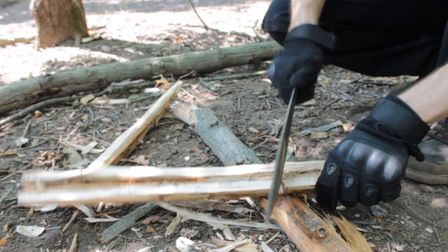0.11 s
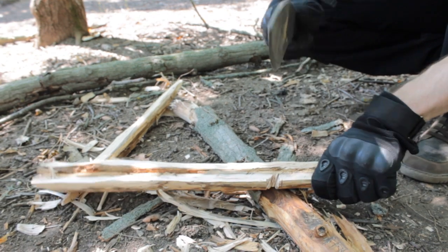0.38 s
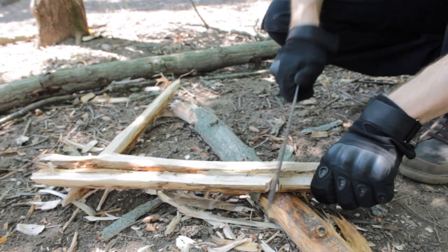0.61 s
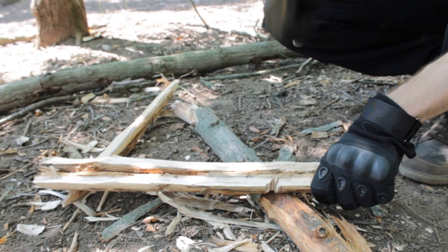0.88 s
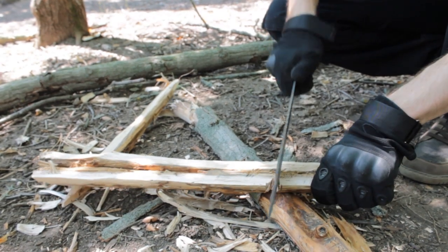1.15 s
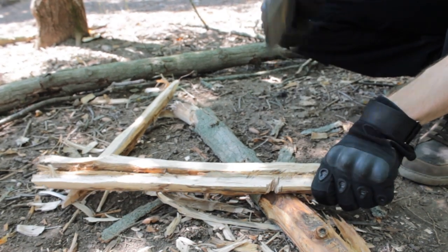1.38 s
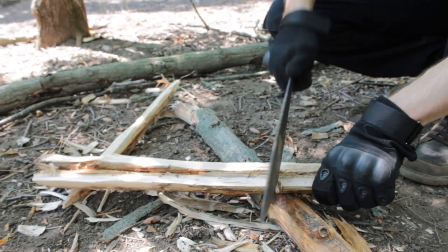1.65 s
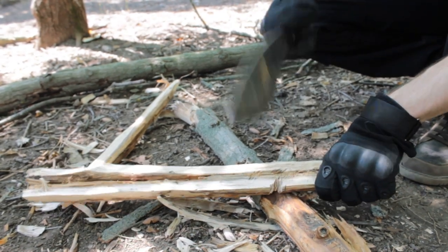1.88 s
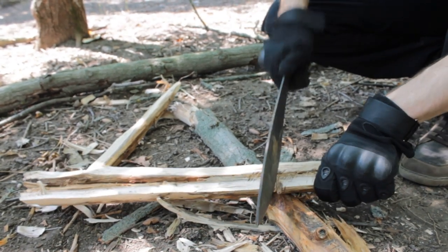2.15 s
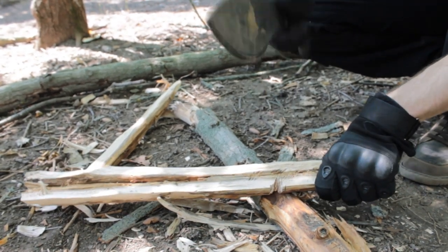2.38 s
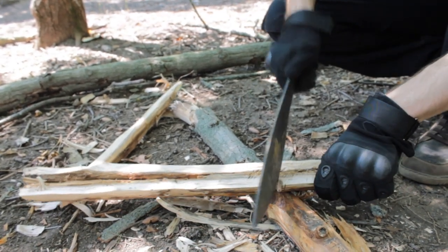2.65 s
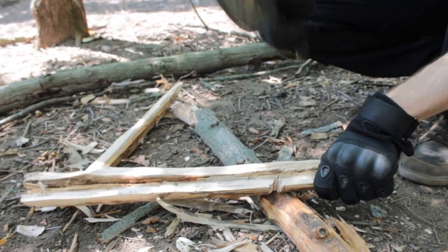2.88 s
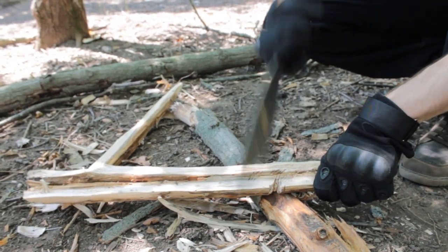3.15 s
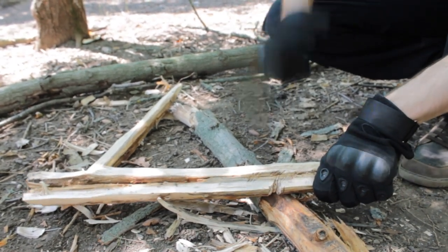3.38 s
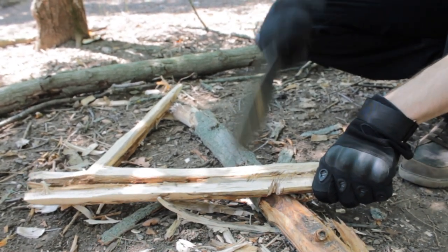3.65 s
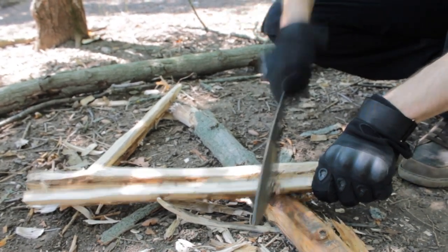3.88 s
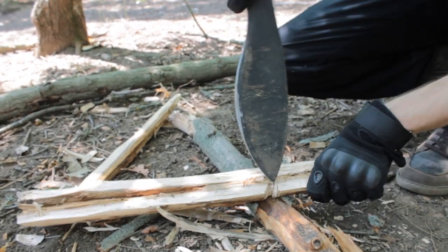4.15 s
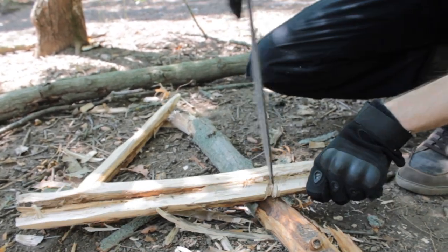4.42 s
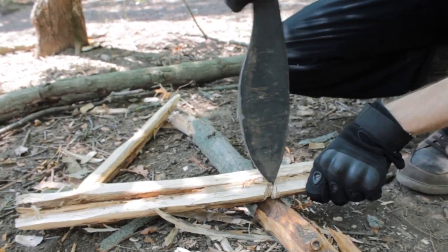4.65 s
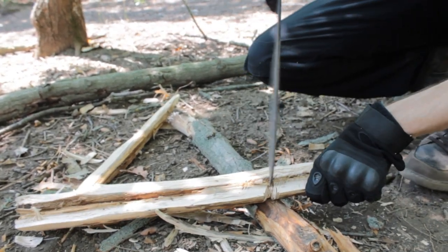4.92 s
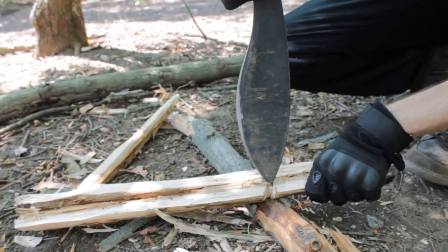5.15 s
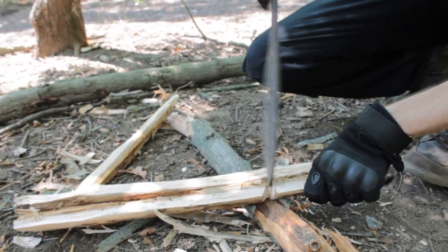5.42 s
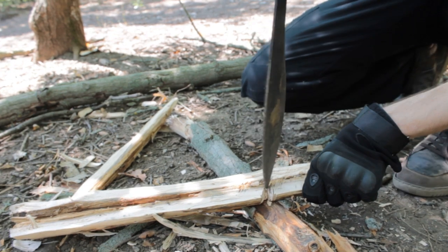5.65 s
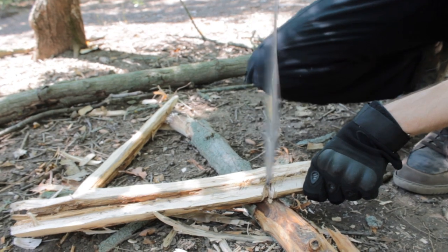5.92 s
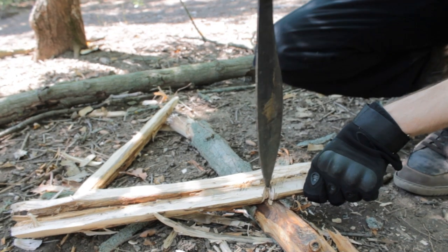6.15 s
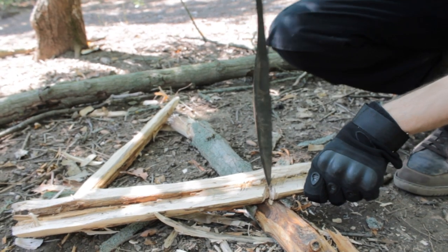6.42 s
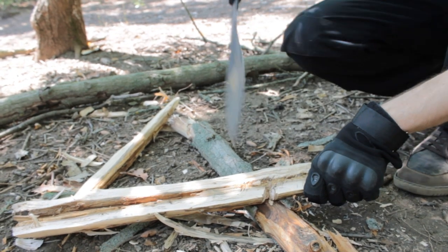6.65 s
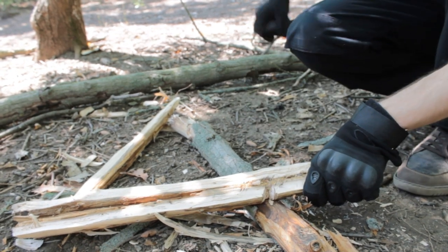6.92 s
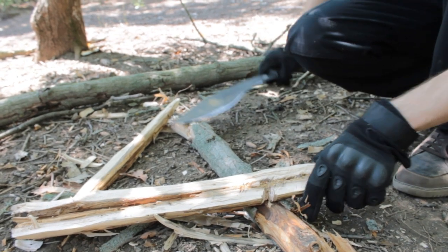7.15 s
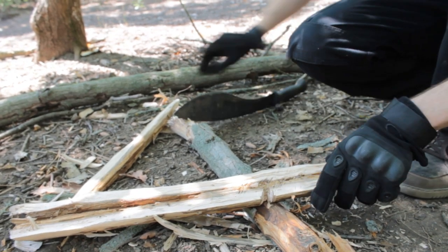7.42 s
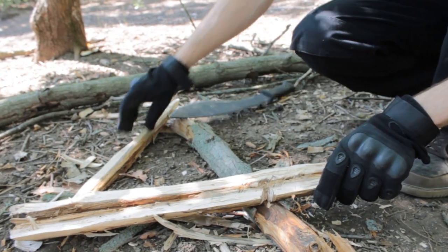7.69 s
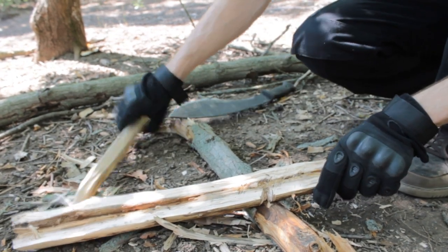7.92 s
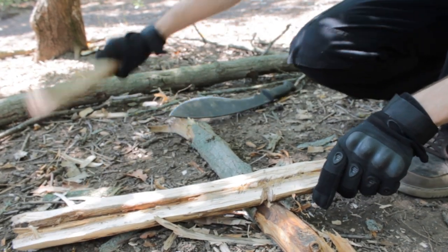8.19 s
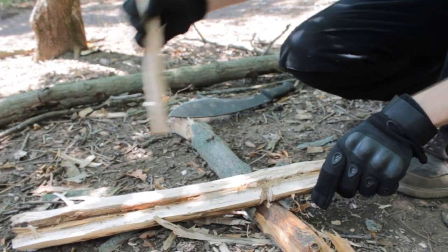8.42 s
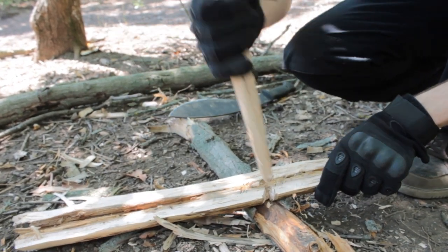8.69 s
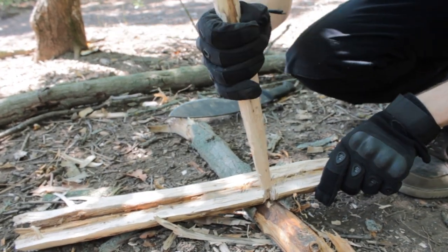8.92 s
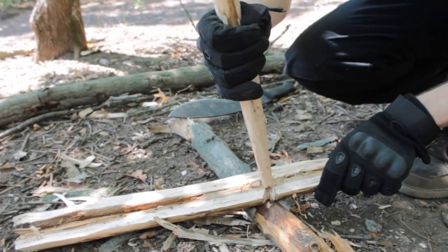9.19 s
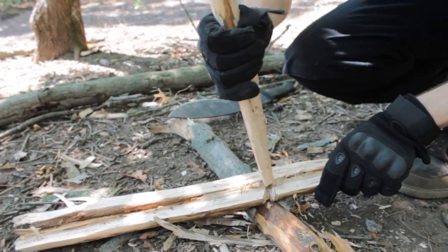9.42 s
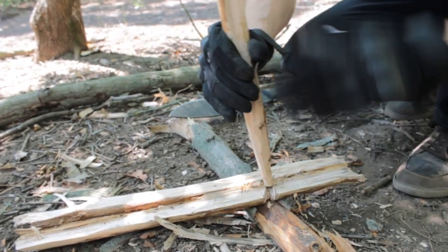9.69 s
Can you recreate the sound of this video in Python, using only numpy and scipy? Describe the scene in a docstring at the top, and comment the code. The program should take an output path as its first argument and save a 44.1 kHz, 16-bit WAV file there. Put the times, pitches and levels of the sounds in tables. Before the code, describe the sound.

After a small rustle and click, a heavy blade chops a split stick seven times, about twice a second, so close the blows clip. Each dry woody crack gets a short scattered echo from the trunks. Then quiet picking ticks, the blade set down with a clatter, wooden pieces handled, litter scrapes, and a sharp twig snap near the end, over faint forest air and distant birds.

```python
"""Leaves rustle and a small contact clicks, then a heavy blade chops seven times into a split stick
in a forest clearing, so close that the blows clip the microphone input: struck wood and steel ring
as damped resonances, torn fibres are noise bursts, and the trunks answer with scattered noise.
Afterwards chips click, the tip picks at the notch, blade and wedge are moved about, a twig snaps.
Filtered noise makes litter, two breeze puffs and forest air; gliding sines are birds far off."""
import sys
import numpy as np
from scipy import signal
from scipy.fft import rfft, irfft, next_fast_len
from scipy.io import wavfile
from scipy.ndimage import uniform_filter1d

SR = 44100
rng = np.random.default_rng(int(sys.argv[2]) if len(sys.argv) > 2 else 0)


def ratio_of_db(decibels):
    """Turn decibels (scalar or array-like) into linear amplitude factors; 0 dB maps to 1."""
    return 10 ** (np.asarray(decibels, float) / 20)


def master(y):
    """Save y as 16-bit WAV."""
    cut = np.clip(np.atleast_2d(y).T, -1, 1)
    pcm = np.round(cut * 32767)  # scale
    wavfile.write(sys.argv[1], SR, pcm.astype(np.int16))


N = 432621  # samples

# All levels are those at the microphone, ahead of its input stage.
# Blows on the stick. Each row: start in seconds, knock peak in dB, bite time constant in ms,
# thud peak over the knock in dB, crack peak over the knock in dB.
CHOP_BLOWS = [(.582, 1.5, 3.2, -14.5, -8.5), (1.114, 8.5, 3, -10, -9.5), (1.59, 8.5, 3.8, -4.5, -7.5),
              (2.123, 1, 2.3, -3.5, -3.5), (2.557, 8, 3.7, -7, -3), (3.026, 9.5, 3, -0.5, -6),
              (3.489, 7, 1.8, -8, -0.5)]
# Low bending of the struck stick. Each row: centre in Hz, width in Hz, relative level in dB.
THUD_MODES = [(104, 41, -12.5), (175, 96, -1.5), (477, 230, 6)]
# Short knock of the struck stick. Each row: centre in Hz, width in Hz, relative level in dB.
KNOCK_MODES = [(900, 350, -4.5), (1263, 150, 2), (1554, 370, 2.5), (1875, 980, -0.5), (2540, 680, -8),
               (3300, 590, -10)]
# Spectrum of tearing fibres. Each row: frequency in Hz, relative density in dB per Hz.
CRACK_SPECTRUM = [(1180, -38.5), (2000, -1.5), (2720, -11), (3430, 2.5), (5470, -4), (7200, 1),
                  (7720, -2.5), (15200, -22), (16500, -31)]
FIRST_TOUCH = 2.5  # the edge's first jerk, over the random ones that follow

# Ringing of the steel blade. Each row: frequency in Hz, relative level in dB, free t60 in seconds.
BLADE_MODES = [(2250, -1, 0.083), (3950, 0, 0.15), (5520, -1.5, 0.23), (7150, -1.5, 0.23)]
BLADE_DB, BLADE_FREE = -39, .9  # ring under the blow; factor on the free t60 during a blow
# Light knocks on the steel. Each row: start in seconds, level in dB, factor on the free t60,
# favoured mode in Hz.
STEEL_PINGS = [(1.778, -47.5, 0.85, 5520), (2.257, -49, .4, 5520), (5.843, -46.5, 0.32, 5520),
               (5.846, -49, 0.35, 7150), (7.353, -48, 2.2, 3950)]

# Scatter among the trunks. Each row: frequency in Hz, t60 in seconds.
TRUNK_DECAY = [(60, .16), (300, 0.12), (1000, 0.15), (2000, 0.15), (5000, 0.25), (7000, .3), (9500, .3),
               (15000, .15)]
# Distinct echoes in that scatter. Each row: delay in seconds, lift in dB.
TRUNK_ECHOES = [(.026, 3.5), (0.061, 2.5), (.13, 2), (0.202, 3.5)]
# Wash from deeper in the wood. Each row: frequency in Hz, level at zero delay in dB.
DEEP_WASH = [(300, -40.5), (1000, -11), (1600, -13.5), (2200, -12), (4500, -21.5), (9000, -40.5)]
DEEP_T60_S, UNEVEN_DB = 0.39, 1.4  # decay of the wash; scale of its random unevenness
# Colour of the clearing's answer. Each row: frequency in Hz, gain in dB.
ECHO_COLOUR = [(35, -27), (60, 5.5), (422, -2.5), (559, -4), (1300, 1), (1940, -6), (2240, -4), (2700, -4),
               (4750, -5), (15000, -28.5), (16500, -46.5)]
ECHO_DB = -22  # gain of the answer, beside the blow
# Bands in which a blow hangs on among the trunks. Each row: centre in Hz, width in Hz,
# mean relative level in dB.
LINGER_BANDS = [(1330, 250, -1), (1700, 250, -1.5), (2170, 220, -1), (3240, 350, -6), (4220, 520, -5.5)]
LINGER_DB, LINGER_T60_S, LINGER_RISE_S, LINGER_SCATTER_DB = -42, 0.56, .07, 2

# Small contacts of wood and chips. Each row: start in seconds, scratch peak in dB,
# ring peak over the scratch in dB, pitch of the piece in Hz.
CONTACT_TAPS = [(.1042, -31.5, -23, 1430), (.2887, -40.5, -32, 1840), (.3496, -41.5, -21, 2700),
                (.6529, -36, 15, 1570), (.6810, -29, -16, 1930), (.7637, -37, -16, 2580),
                (.8131, -43, -7, 1500), (.8649, -45.5, -12, 2500), (1.7778, -40.5, -2, 1900),
                (1.8153, -35, -17, 1670), (1.868, -43, -17, 2100), (1.956, -41.5, -19, 1430),
                (2.2204, -33, -20, 2720), (2.2555, -36, -17, 2250), (2.7447, -29, -10, 1530),
                (3.0944, -25, -12, 1880), (3.1473, -34, -10, 1510), (4.2024, -44, 5, 2000),
                (4.3625, -44, -9, 1630), (4.515, -52, 7, 760), (5.1144, -42, -12, 2700),
                (5.4643, -44, -17, 1450), (5.6054, -36.5, -11.5, 1700), (5.8433, -37, -8, 1590),
                (6.0838, -41.5, -14, 1650), (6.1106, -53.5, 8, 690), (6.2609, -38.5, -24, 2800),
                (7.0282, -40, -8, 1400), (7.1345, -25.5, 10.5, 1140), (7.1402, -29.5, 1, 1390),
                (7.218, -26.5, 9, 1106), (7.2609, -41, 3, 1090), (7.2944, -54, 19, 1090),
                (7.3072, -36, -15, 2010), (7.338, -40, 2, 1750), (7.3506, -13.5, -1, 1710),
                (7.3676, -36, 7, 2000), (7.4075, -34.5, 5, 1130), (7.414, -44.5, 10, 2400),
                (7.5761, -50, 15, 1160), (7.6492, -23.5, -13, 1700), (7.6544, -23.5, -1, 970),
                (7.6831, -40, 7, 1060), (7.7027, -38, 10, 1180), (7.9195, -26, -4, 2200),
                (7.9307, -32, -10, 1900), (7.9423, -30, 2, 1060), (7.9555, -31.5, 8.5, 1860),
                (7.9745, -38, 14, 1980), (7.9816, -32.5, 10, 1800), (7.9962, -30, -2, 1600),
                (8.0105, -19, -14, 1700), (8.0702, -25.5, -16, 2220), (8.3479, -43, -19, 1450),
                (8.3914, -36.5, -20, 1310), (8.552, -41, -3, 1870), (8.7202, -28, -22, 1200),
                (8.765, -32, -8, 1190), (8.8496, -42, -17, 1450), (9.1689, -37, -20, 1400),
                (9.3297, -32, -27.5, 1070), (9.3423, -28.5, -19.5, 2240), (9.5014, -39, -12, 1700),
                (9.6053, -54, -1, 1500), (9.6455, -22.5, 2.5, 1380), (9.7364, -34, -20, 1750)]
SCRATCH_OVER_RING, SCRATCH_TOP_OVER_RING = 2.48, 5.3  # scratch centre and upper corner over the pitch
SCRATCH_T60_S, RING_T60_S = .03, .026  # RING_T60_S is an added damping of what excites the ring
FAINT_PER_S, FAINT_DB, FAINT_SPREAD_DB = 5, -51.5, 4  # stray crumbs of bark and leaf; spread is +-
# Thin high snaps of dry bark. Each row: start in seconds, peak in dB.
BARK_TICKS = [(1.285, -55), (1.71, -49), (1.778, -41.5), (1.79, -35), (1.857, -48), (4.452, -48),
              (4.605, -53.5), (4.785, -49), (4.815, -39), (3.775, -56), (4.926, -54), (5.031, -44),
              (5.066, -34), (5.157, -50), (6.262, -36), (7.308, -38), (7.337, -40), (7.617, -41),
              (7.9186, -41), (7.9307, -36), (7.9423, -34), (8.08, -44), (8.098, -41), (9.335, -45)]
# Weight landing on soil. Each row: start in seconds, peak in dB.
SOIL_THUMPS = [(0.12, -38.5), (7.136, -41.5), (7.219, -44), (7.351, -29), (7.655, -55), (7.979, -41.5),
               (8.521, -53), (8.766, -56), (9.643, -49)]

# Twig breaking fibre by fibre. Each entry: one crack's level in dB, on top of SNAP_DB.
SNAP_CRACKS = [-2.5, -2.5, -0.5, -12]
SNAP_S, SNAP_GAP_S, SNAP_T60_S = 9.640, 0.0026, 0.0079  # first crack, time between cracks, decay
SNAP_DB, SNAP_ECHO_DB = -8.5, -23.5  # reference peak; echo peak over it

# Scrapes and brushing through litter. Each row: start in seconds, length in seconds,
# rms level ahead of the swell in dB, centre in Hz.
LITTER_SCRAPES = [(0.104, .053, -43, 2560), (.616, 0.013, -31.5, 6000), (0.679, 0.017, -40, 5000),
                  (9.588, .022, -47.5, 6000), (4.098, 0.17, -60, 4500), (4.148, 0.29, -55.5, 1000),
                  (5.056, 0.06, -59, 7500), (5.817, 0.044, -48, 3500), (6.26, 0.052, -55.5, 5070),
                  (6.534, 0.082, -55.5, 1100), (6.869, 0.16, -54, 4030), (7.331, 0.05, -42, 3430),
                  (7.915, 0.14, -39.5, 2700), (8.047, .077, -44.5, 4100), (8.334, 0.09, -48, 3220),
                  (8.441, 0.15, -53, 4450), (9.306, 0.055, -48.5, 3540), (9.494, 0.15, -54.5, 3970)]
# Spectrum of dry leaves. Each row: frequency in Hz, relative density in dB per Hz.
LEAF_SPECTRUM = [(470, -37), (800, -8.5), (1250, -6.5), (1490, -1.5), (1630, -3.5), (2380, -2.5),
                 (6460, -5.5), (15100, -26.5), (16500, -34.5)]
# Stir of litter and cloth. Each row: time in seconds, leaf crackle rms in dB.
STIR_LEVEL = [(0, -59), (.95, -64), (1.3, -65), (1.77, -58.5), (2.0, -65), (2.7, -60), (2.9, -65),
              (3.651, -62), (4.02, -66), (4.2, -60), (5.501, -63.5), (6.67, -62), (7.0, -61.5), (7.32, -54),
              (7.7, -62.5), (8.4, -58.5), (9.2, -67), (9.55, -58.5), (9.81, -64)]
# Soft shuffle of cloth and soil. Each row: frequency in Hz, relative density in dB per Hz.
SHUFFLE_SPECTRUM = [(60, -23.5), (150, -2.0), (400, 0.5), (1100, -4.5), (2200, -14.5), (5000, -51.0)]
SHUFFLE_DB, SHUFFLE_FOLLOWS = -61, .3  # mean level; its share of the stir's swings

# Breeze on the microphone. Each row: centre in seconds, Gaussian half-length in seconds,
# rms at the centre in dB.
BREEZE_PUFFS = [(4.7, .12, -71), (5.0, 0.11, -67)]
# Spectrum of the breeze. Each row: frequency in Hz, relative density in dB per Hz.
BREEZE_SPECTRUM = [(10, -20), (30, -3), (60, -5), (150, -50)]
# Far bird chirps. Each row: start in seconds, length in seconds, start pitch in Hz,
# end pitch in Hz, mean level in dB.
FAR_CHIRPS = [(.36, .05, 2450, 2250, -66), (.51, .025, 3400, 3280, -64), (8.98, 0.044, 2900, 3300, -64),
              (.41, .04, 3370, 3530, -64), (.445, .023, 2980, 3020, -61), (1.42, 0.018, 3300, 3730, -57),
              (2.372, .025, 2440, 4420, -47.5), (2.48, .033, 2700, 3360, -44.5),
              (4.96, .059, 2494, 4030, -61.5), (6.57, 0.047, 2920, 2980, -58),
              (6.65, 0.046, 3180, 3560, -61.5), (6.775, 0.031, 2750, 3100, -57),
              (8.185, 0.032, 3240, 4200, -57), (8.83, .028, 2700, 3970, -55.5),
              (9.365, .025, 2590, 2943, -69)]
# Faint far held notes. Each row: start in seconds, length in seconds, start pitch in Hz,
# end pitch in Hz, mean level in dB.
FAR_NOTES = [(.16, .23, 1200, 1218, -68), (6.68, 0.093, 1552, 1616, -53.5), (6.9, 0.14, 1328, 1380, -63.5),
             (7.77, .24, 1280, 1230, -64), (8.03, 0.25, 1230, 1180, -60), (8.26, 0.62, 1524, 1400, -68)]
# Forest air. Each row: frequency in Hz, relative density in dB per Hz.
AIR_SPECTRUM = [(15, -56.5), (25, -23.5), (58, -5), (226, 3), (259, -8), (470, -5.5), (854, -20), (979, -4),
                (1830, -15), (3150, -5.5), (5270, -21), (15200, -19), (16500, -20)]
AIR_DB = -66  # rms
CLIP = .73  # ceiling of the microphone input


def unit(x):
    """Scale to rms 1."""
    return x / np.sqrt(np.mean(x ** 2) + 1e-20)


def peak(x):
    """Scale to peak 1."""
    return x / np.max(np.abs(x))


def noise(t):
    """White noise as long as the time axis t."""
    return rng.standard_normal(len(t))


def decay(t, t60):
    """Exponential decay by 60 dB in t60 seconds."""
    return ratio_of_db(-60 * t / t60)


def along(points, hz):
    """(Hz, value) points read on a log axis."""
    f, v = np.transpose(points)
    return np.interp(np.log(hz + 1), np.log(f + 1), v)


def filtered(x, response):
    """x times a complex response of frequency."""
    m = next_fast_len(len(x) + 4096)
    return irfft(rfft(x, m) * response(np.fft.rfftfreq(m, 1 / SR)), m)[:len(x)]


def coloured(spectrum, size):
    """Noise of rms 1 with a given spectrum."""
    return unit(filtered(rng.standard_normal(size), lambda hz: ratio_of_db(along(spectrum, hz))))


def modes(table):
    """Causal response of a few resonances with alternating signs."""
    def response(f):
        total = 0
        for k, (centre, width, db) in enumerate(table):
            damping = 1j * f * width
            total = total + (-1) ** k * ratio_of_db(db) * damping / (centre ** 2 - f ** 2 + damping)
        return total
    return response


def broad(hz, spread, top_hz):
    """A wide hump of spectrum around hz, falling steeply above top_hz."""
    hump = modes([(hz, spread * hz, 0)])
    return lambda f: hump(f) * 1j * f / (600 + 1j * f) / (1 + 1j * f / top_hz) ** 2


def patches(shape, size):
    """A random field, rms 1, smooth over size = (bins, frames)."""
    over_bins = uniform_filter1d(rng.standard_normal(shape), size[0], 0)
    return unit(uniform_filter1d(over_bins, size[1], 1))


def add(track, s, sound):
    """Mix a sound in at time s."""
    part = track[round(s * SR):][:len(sound)]
    part += sound[:len(part)]


def chops():
    """Each blow sounds with the faint ring of the steel and the answer of the clearing."""
    out, t = np.zeros(N), np.arange(SR // 2) / SR
    for s, db, bite_ms, thud_db, crack_db in CHOP_BLOWS:
        sound = blow(t, bite_ms / 1000, thud_db, crack_db)
        sound = sound + linger(t) + ratio_of_db(ECHO_DB) * answer(len(t))
        sound = sound + ratio_of_db(BLADE_DB) * steel(t, BLADE_FREE, BLADE_MODES[0][0])
        add(out, s, ratio_of_db(db) * sound)
    return out


def blow(t, bite_s, thud_db, crack_db):
    """The edge bites in jerks that set the stick thudding and knocking while its fibres tear."""
    bite = (1 - np.exp(-t / .0005)) * np.exp(-(t / bite_s) ** 3)
    touch = FIRST_TOUCH * np.exp(-((t - .0004) / 0.0001) ** 2)
    jerks = (bite + 0.049 * decay(t, 0.089)) * noise(t) + touch
    # fibres part after the first contact
    splinters = (1 - np.exp(-(t / .0015) ** 2)) * (bite + 0.076 * decay(t, 0.049))
    knock = peak(filtered(jerks, modes(KNOCK_MODES)))
    thud = peak(filtered(jerks, modes(THUD_MODES)))
    crack = peak(splinters * coloured(CRACK_SPECTRUM, len(t)))
    return knock + ratio_of_db(thud_db) * thud + ratio_of_db(crack_db) * crack


def steel(t, free, favoured):
    """The blade rings mostly in the mode that moves where it is touched; wood at the edge damps it."""
    ring = np.zeros(len(t))
    for hz, db, t60 in BLADE_MODES:
        off_mode_db = 30 * abs(np.log(hz / favoured))
        tone = np.sin(2 * np.pi * hz * t + 6 * rng.random())
        ring += ratio_of_db(db - off_mode_db) * decay(t, free * t60) * tone
    return ring


def linger(t):
    """A blow hangs on among the trunks: resonant noise that rises late and dies slowly."""
    bands = [(hz, width, db + rng.normal(0, LINGER_SCATTER_DB)) for hz, width, db in LINGER_BANDS]
    swell = (1 - np.exp(-t / LINGER_RISE_S)) * decay(t, LINGER_T60_S)
    return ratio_of_db(LINGER_DB) * swell * unit(filtered(noise(t), modes(bands)))


def trunks(size, rise=.004):
    """Dense scatter from ground and trunks, then a slower woody wash; each frequency has its decay."""
    hz, t, z = signal.stft(rng.standard_normal(size), SR, nperseg=256)
    near = decay(t, along(TRUNK_DECAY, hz)[:, None])
    deep = ratio_of_db(along(DEEP_WASH, hz)[:, None]) * decay(t, DEEP_T60_S)
    echoes_db = sum(db * np.exp(-((t - s) / 0.007) ** 2) for s, db in TRUNK_ECHOES)
    # every call excites other bands
    uneven_db = UNEVEN_DB * (patches(z.shape, size=(3, 60)) + .7 * patches(z.shape, size=(10, 4)))
    z = z * ratio_of_db(echoes_db + uneven_db) * (near + deep)
    tail = signal.istft(z, SR, nperseg=256)[1][:size]
    return tail * (1 - np.exp(-(np.arange(size) / SR / rise) ** 2))


def answer(size):
    """The clearing answers: scatter from the trunks in the colour of the echo."""
    return filtered(trunks(size), lambda hz: ratio_of_db(along(ECHO_COLOUR, hz)))


def taps():
    """Each contact is a broad, sharp scratch, a short ring of the wood and a faint answer."""
    out, t = np.zeros(N), np.arange(SR // 6) / SR
    for s, db, ring_db, hz in list(CONTACT_TAPS) + crumbs():
        envelope = (1 - np.exp(-t / 0.0002)) * (decay(t, SCRATCH_T60_S) + 2.7 * decay(t, 0.018))
        top_hz = SCRATCH_TOP_OVER_RING * hz  # small pieces scratch brighter
        hump = broad(SCRATCH_OVER_RING * hz, spread=1.6, top_hz=top_hz)
        wood = modes([(hz, 0.068 * hz, 2), (0.64 * hz, 0.25 * hz, -10), (1.32 * hz, 0.47 * hz, -2)])
        scratch = peak(filtered(envelope * noise(t), lambda f: hump(f) / (1 + 1j * f / top_hz)))
        rub = envelope * noise(t) * decay(t, RING_T60_S)
        ring = peak(filtered(rub, lambda f: wood(f) / (1 + 1j * f / top_hz)))
        echo = ratio_of_db(max(ring_db, 0) - 26) * peak(answer(len(t)))
        add(out, s, ratio_of_db(db) * (scratch + ratio_of_db(ring_db) * ring + echo))
    return out


def crumbs():
    """Faint crumbs of bark and leaf at random times, in rows like those of the taps."""
    rows = []
    for when, loud, dull, pitch in rng.random((round(FAINT_PER_S * N / SR), 4)):
        db = FAINT_DB + FAINT_SPREAD_DB * (2 * loud - 1)
        rows.append((when * N / SR, db, -20 * dull, 1000 * 2.8 ** pitch))
    return rows


def pings():
    """Light knocks set the steel ringing alone."""
    out, t = np.zeros(N), np.arange(SR // 6) / SR
    for s, db, free, favoured in STEEL_PINGS:
        add(out, s, ratio_of_db(db) * steel(t, free, favoured))
    return out


def ticks():
    """Dry bark snaps: very short noise through a wide resonance high in the treble."""
    out, t = np.zeros(N), np.arange(SR // 6) / SR
    thin = modes([(12500, 9000, 0)])
    for s, db in BARK_TICKS:
        add(out, s, ratio_of_db(db) * peak(filtered(decay(t, 0.0069) * noise(t), lambda f: thin(f) ** 2)))
    return out


def thumps():
    """Weight lands on soil: a noise burst through broad, heavily damped low resonances."""
    out, t = np.zeros(N), np.arange(SR // 6) / SR
    soil = modes([(140, 110, 0), (330, 250, -6)])
    for s, db in SOIL_THUMPS:
        burst = decay(t, 0.098) * noise(t)
        add(out, s, ratio_of_db(db) * peak(filtered(burst, lambda f: soil(f) * (1j * f / (70 + 1j * f)) ** 2)))
    return out


def twig():
    """A quick run of needle-sharp, very broad cracks and their answer from the trunks."""
    out, t = np.zeros(N), np.arange(SR // 20) / SR
    for k, db in enumerate(SNAP_CRACKS):
        burst = decay(t, SNAP_T60_S) * noise(t)
        crack = peak(filtered(burst, broad(5400, spread=2.6, top_hz=14000)))
        add(out, SNAP_S + k * SNAP_GAP_S, ratio_of_db(SNAP_DB + db) * crack)
    echo = peak(filtered(trunks(SR // 4), broad(3800, spread=1.5, top_hz=9000)))
    add(out, SNAP_S, ratio_of_db(SNAP_DB + SNAP_ECHO_DB) * echo)
    return out


def scrapes():
    """A stroke drags over bark and litter: gritty noise that swells and fades."""
    out = np.zeros(N)
    for s, length, db, hz in LITTER_SCRAPES:
        u = np.linspace(0, 1, round(length * SR))
        grit = ratio_of_db(2.94 * unit(uniform_filter1d(noise(u), 70)))
        swell = np.sin(np.pi * u ** 0.95).clip(0)
        drag = unit(filtered(grit * noise(u), broad(hz, spread=2.2, top_hz=7200)))
        add(out, s, ratio_of_db(db) * swell * drag)
    return out


def leaves():
    """Dry litter stirs in patches; cloth and soil shuffle softly along with it."""
    stir_db = np.interp(np.arange(N) / SR, *np.transpose(STIR_LEVEL))
    z = signal.stft(coloured(LEAF_SPECTRUM, N), nperseg=256)[2]
    z = z * ratio_of_db(1.7 * patches(z.shape, size=(14, 14)))
    crackle = unit(signal.istft(z, nperseg=256)[1][:N])
    shuffle_db = SHUFFLE_DB + SHUFFLE_FOLLOWS * (stir_db - stir_db.mean())
    return ratio_of_db(stir_db) * crackle + ratio_of_db(shuffle_db) * coloured(SHUFFLE_SPECTRUM, N)


def breeze():
    """Short deep puffs of wind: low noise under Gaussian swells."""
    t = np.arange(N) / SR
    swell = sum(ratio_of_db(db) * np.exp(-((t - s) / length) ** 2) for s, length, db in BREEZE_PUFFS)
    return swell * coloured(BREEZE_SPECTRUM, N)


def birds():
    """Chirps and held notes from far off, scattered by the wood on their way."""
    far = whistles(FAR_CHIRPS, waver_db=1.5) + whistles(FAR_NOTES, waver_db=2.2)
    return distant(far, wet_db=-6.5)


def whistles(table, waver_db):
    """Gliding sines with a soft swell and an unsteady level."""
    out = np.zeros(N)
    for s, length, hz, end_hz, db in table:
        u = np.linspace(0, 1, round(length * SR))
        phase = 2 * np.pi * np.cumsum(hz + (end_hz - hz) * u) / SR
        # 30 random levels a second
        flutter = np.interp(u * length * 30, np.arange(40), rng.standard_normal(40))
        swell = np.sqrt(np.sin(np.pi * u).clip(0))
        add(out, s, ratio_of_db(db + waver_db * flutter) * swell * np.sin(phase))
    return out


def distant(x, wet_db):
    """Far sounds arrive with their own scatter through the wood."""
    tail = trunks(SR // 3)
    return x + ratio_of_db(wet_db) * signal.fftconvolve(x, tail / np.linalg.norm(tail))[:N]


def air():
    """The steady hush of the forest: coloured noise."""
    return ratio_of_db(AIR_DB) * coloured(AIR_SPECTRUM, N)


def scene():
    """All sources at one microphone."""
    handling = taps() + pings() + ticks() + thumps() + twig() + scrapes()
    background = leaves() + breeze() + birds() + air()
    return (chops() + handling + background)[None]


def low_pass(x):
    """Removes everything above the highest recorded frequency."""
    return signal.sosfilt(signal.butter(12, 17110, fs=SR, output="sos"), x)


def record(dry):
    """The input stage clips hard on the blows, then sheds the deepest bass and the top treble."""
    clipped = dry / (1 + np.abs(dry / CLIP) ** 12) ** (1 / 12)

    def coupling(hz):
        bass_cut = 1j * hz / (45 + 1j * hz)
        return bass_cut / (1 + (hz / 15950) ** 150)

    return low_pass(filtered(clipped[0], coupling)[None])


dry = scene()
out = record(dry)
master(out)
```